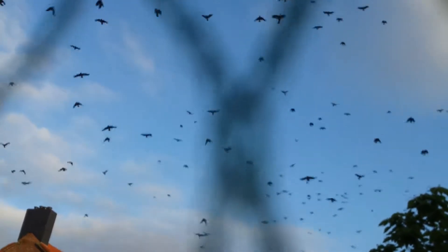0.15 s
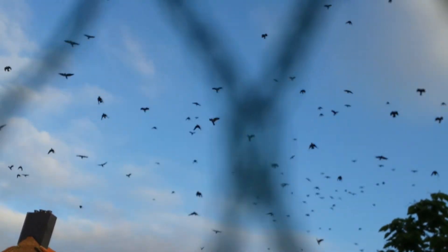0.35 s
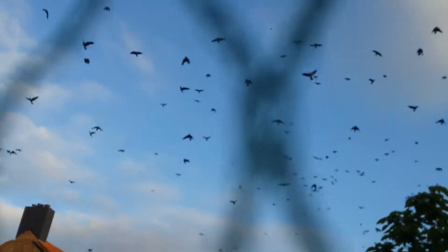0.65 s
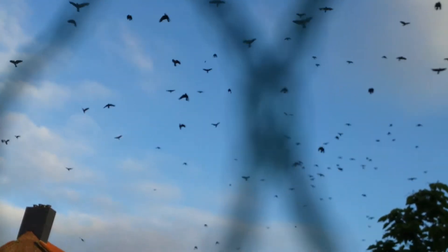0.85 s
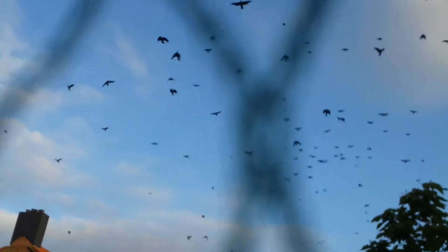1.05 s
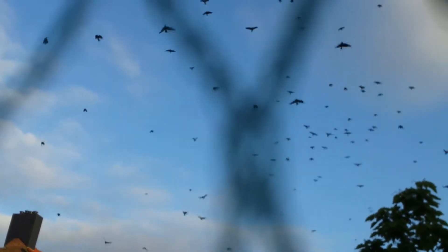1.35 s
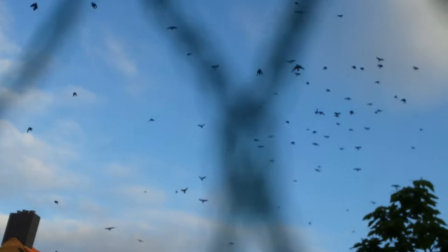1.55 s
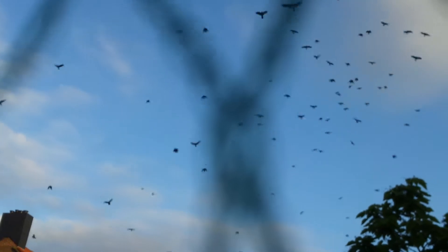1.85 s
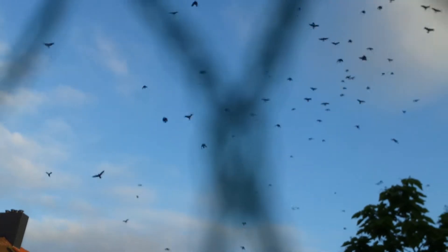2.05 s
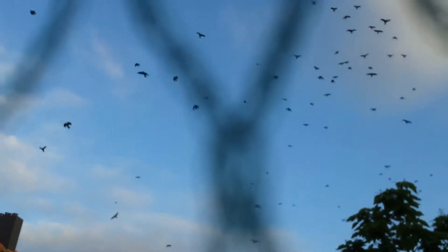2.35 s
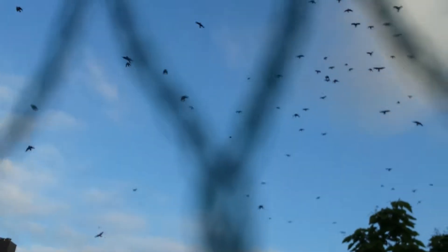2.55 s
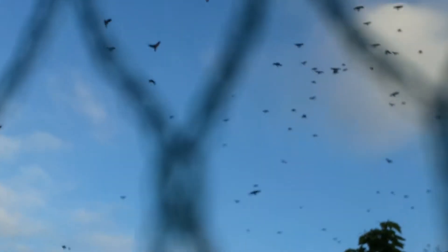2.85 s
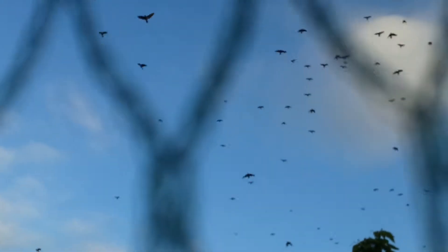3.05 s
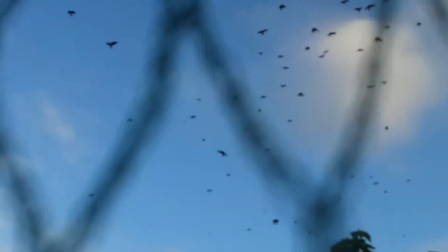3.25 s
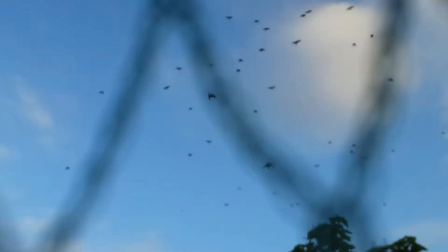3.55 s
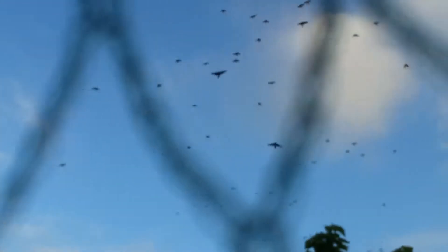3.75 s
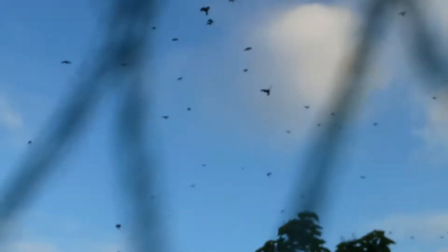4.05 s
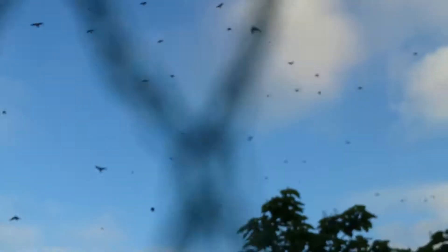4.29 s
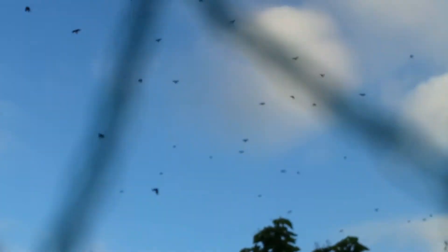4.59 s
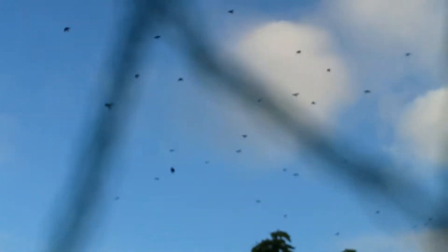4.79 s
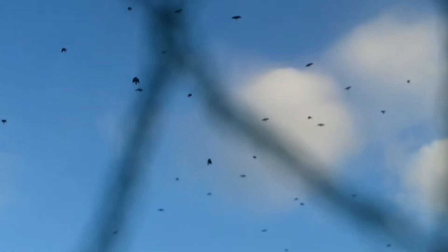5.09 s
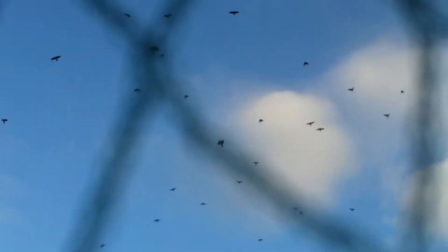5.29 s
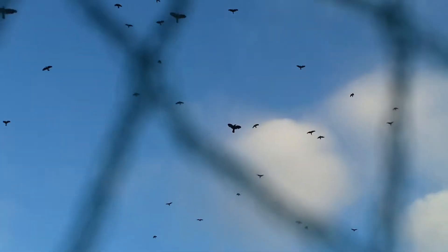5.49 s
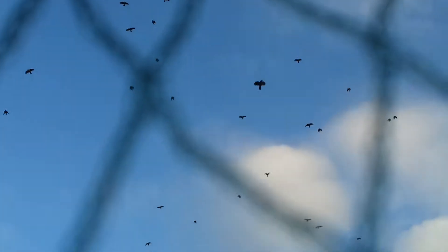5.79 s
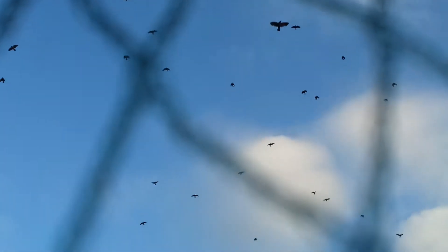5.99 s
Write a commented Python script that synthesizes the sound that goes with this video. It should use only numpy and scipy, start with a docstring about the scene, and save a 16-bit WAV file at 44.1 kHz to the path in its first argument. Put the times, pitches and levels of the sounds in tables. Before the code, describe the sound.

A large flock of jackdaws chatters overhead with short, sharp falling calls, thinning gradually over a faint town hum.

```python
"""A flock of jackdaws wheels over rooftops, heard from the ground by a two-port camera microphone.
From the start the town hums behind a dense chatter, each call a short falling stack of overtones
smeared by house walls. Closer groups flare up and the nearest birds cut through one by one.
After a second or so light wind creeps in and thuds on the ports. The far chatter drifts off,
thinnest near four seconds, then returns a little while the close calls carry on to the end."""
import sys
import numpy as np
from scipy import signal
from scipy.fft import rfft, irfft, next_fast_len
from scipy.io import wavfile
from scipy.ndimage import uniform_filter1d, map_coordinates

SR = 44100
rng = np.random.default_rng(int(sys.argv[2]) if len(sys.argv) > 2 else 0)


def wrap_up_sound(samples):
    """Save the sound to the file named by the first command line argument, as 16-bit audio."""
    columns = np.atleast_2d(samples).T
    # keep every value between -1 and 1, then stretch to whole-number steps
    tamed = np.clip(columns, -1, 1)
    steps = np.round(tamed * 32767).astype(np.int16)
    wavfile.write(sys.argv[1], SR, steps)


N = 270333

# Tone of a call through throat, air and microphone. Each row: frequency in Hz, gain in dB.
CALL_EQ = [(120, -70), (470, -21), (800, -18.5), (955, -19.5), (1170, -12), (1750, -4.5), (2010, -5),
           (2580, -1.5), (3470, -15.5), (4240, -7), (4940, -6.5), (8820, -11), (11000, -20.5), (12800, -32),
           (14000, -55)]
# Hum and wind lean left in the bass. Each row: frequency in Hz, left over right in dB.
RUMBLE_PAN = [(40, 8), (170, 2.5), (500, 0.5), (1500, -1)]


def amp(db):
    """Gain of a level in dB."""
    return 10 ** (np.asarray(db) / 20)


def unit(x):
    """x at rms 1."""
    return x / np.sqrt(np.mean(x ** 2) + 1e-20)


def along(points, hz):
    """Read a curve of (Hz, value) points on a log frequency axis."""
    freqs, values = np.transpose(points)
    return np.interp(np.log(hz + 1), np.log(freqs + 1), values)


def fader(points):
    """A gain for every sample, riding through (seconds, dB) points."""
    times, db = np.transpose(points)
    return amp(np.interp(np.arange(N) / SR, times, db))


def filtered(x, response):
    """Equalise x with a gain given as a function of Hz."""
    size = next_fast_len(N + SR // 2)
    return irfft(rfft(x, size) * response(np.fft.rfftfreq(size, 1 / SR)), size)[..., :N]


def pan(points, hz):
    """Gains of the two ports from (Hz, left over right in dB) points."""
    return amp(np.outer([.5, -.5], along(points, hz)))


def town_hum():
    """Far traffic blurs into a bed of low noise, closest to mono in the upper bass."""
    # Each row: frequency in Hz, relative noise density in dB.
    spectrum = [(60, -79), (100, -36), (135, -17), (206, -8.5), (416, -12.5), (573, -11.5), (652, -16.5),
                (800, -14), (970, -16.5), (1400, -14.5), (1950, -16), (3300, -120)]
    # Each row: time in seconds, level in dB.
    levels = [(0.0, -45.5), (1.96, -47), (2.85, -45), (4.15, -45.5), (6.13, -47.5)]
    # Each row: frequency in Hz, correlation of left and right.
    likeness = [(60, 0.23), (170, 0.82), (350, 0.64), (700, 0.52), (1400, 0.21)]

    def mid_side_eq(hz):
        width = np.arccos(np.clip(along(likeness, hz), -1, 1)) / 2
        return amp(along(spectrum, hz)) * [np.cos(width), np.sin(width)]

    mid, side = filtered(rng.standard_normal((2, N)), mid_side_eq)
    hum = filtered(np.array([mid + side, mid - side]), lambda hz: pan(RUMBLE_PAN, hz))
    return fader(levels) * hum / np.std(hum.mean(0))


def calls(rows, jitter, rasp, beak_width_hz, colour_db, rolloff_db, overtones=10):
    """Jackdaw calls: hoarse, gliding overtone stacks ring through the open beak."""
    # Each row: start and length in seconds, first and last pitch in Hz, source level in dB,
    # beak resonance in Hz, its lift in dB, left over right in dB.
    start, length, hz0, hz1, db, beak_hz, lift_db, pan_db = np.transpose(rows)[:, :, None]
    n = np.arange(int(length.max() * SR) + 1)
    progress = np.clip(n / SR / length, 0, 1)
    noise = rng.standard_normal((2, len(start), len(n)), np.float32)
    pitch_flutter, level_flutter = uniform_filter1d(noise, size=40, axis=2) * np.sqrt(40)
    glide = hz0 + (hz1 - hz0) * progress ** 2 * (3 - 2 * progress)
    pitch = glide * (1 + jitter * pitch_flutter)
    fundamental = np.exp(2j * np.pi * np.cumsum(pitch, 1) / SR).astype(np.complex64)
    colour = amp(colour_db * rng.standard_normal((len(start), overtones))
                 - rolloff_db * np.arange(overtones))
    overtone, voice = np.ones_like(fundamental), 0
    for k in range(1, overtones + 1):
        overtone = overtone * fundamental
        # the beak lifts whichever overtone glides through its resonance
        beak = 1 + (amp(lift_db) - 1) / (1 + ((k * pitch - beak_hz) / beak_width_hz) ** 2)
        voice = voice + colour[:, k - 1:k] * beak * overtone.imag
    envelope = np.clip(n / SR / 0.0085, 0, 1) * (1 - progress ** 4.6)  # sharp attack, fading end
    voice = voice * envelope * amp(db) * (1 + rasp * level_flutter)
    ports = []
    for side in (.5, -.5):
        # a bird to one side is louder and earlier at that port
        at = np.round(start * SR - side * 3 * pan_db).astype(int) + n + SR
        panned = voice * amp(side * pan_db)
        ports.append(np.bincount(at.ravel(), panned.ravel(), N + 2 * SR)[SR:N + SR])
    return np.array(ports)


def wall_echoes(x, hop=4096):
    """Houses scatter the calls; the birds move, so each moment and port gets its own tail."""
    # Each row: frequency in Hz, seconds to die away by 60 dB.
    decay_times = [(800, 0.73), (3000, 0.9), (10000, 0.33)]
    starts = np.arange(0, N, hop)
    padded = np.pad(x, ((0, 0), (hop, 2 * hop)))
    grains = padded[:, starts[:, None] + np.arange(2 * hop)] * np.hanning(2 * hop)
    hz, t, noise = signal.stft(rng.standard_normal((2, len(starts), SR // 3)), SR, nperseg=256)
    decay = amp(-60 * t / along(decay_times, hz)[:, None])
    tails = signal.istft(noise * decay, SR, nperseg=256)[1]
    echoes = signal.fftconvolve(grains, tails / np.linalg.norm(tails[0, 0]), axes=2)
    at = starts[:, None] + np.arange(echoes.shape[2]) + 300  # 7 ms pre-delay: the nearest wall
    return np.array([np.bincount(at.ravel(), port.ravel())[hop:N + hop] for port in echoes])


def chatter_swells():
    """Body and treble gains: closer groups flare over the far birds, losing less treble to the air."""
    # The far birds, drifting off. Each row: time in seconds, level in dB.
    far_levels = [(0, -29.5), (1.2, -29), (2.2, -33), (2.8, -34.5), (4.15, -40.5), (5.2, -36), (6.13, -34)]
    # Each row: start, swell and hold in seconds, body level in dB, treble over body in dB.
    outbursts = [(-.05, 0.037, 0.1, -26, -1), (.16, 0.04, 0.039, -22.5, -6),
                 (.32, 0.088, 0.038, -23.5, 0.5), (.5, 0.023, 0.038, -25.5, -0.5),
                 (.61, 0.045, 0.045, -26, -2), (.84, 0.03, 0.14, -25.5, 1),
                 (1.19, 0.066, 0.092, -31.5, 3.5), (1.4, 0.022, 0.052, -28, -3),
                 (1.575, 0.029, 0.037, -27, -3.5), (1.72, 0.096, 0.13, -29.5, 1.5),
                 (1.98, 0.062, 0.032, -26, -2), (2.19, 0.086, 0.22, -27.5, -3),
                 (2.53, 0.043, 0.024, -31.5, 1.5), (2.8, 0.097, 0.066, -32.5, 1.5),
                 (2.95, 0.077, 0.11, -30.5, -11), (3.07, 0.038, 0.13, -31.5, -3.5),
                 (3.25, 0.07, 0.094, -29, -3), (3.52, 0.022, 0.11, -30.5, -3),
                 (3.715, 0.015, 0.16, -29, -1), (3.85, 0.087, 0.14, -30.5, -2.5),
                 (4.175, 0.025, 0.11, -29, -3.5), (4.39, 0.024, 0.3, -30, -3.5),
                 (4.61, 0.067, 0.14, -32, 0), (4.95, 0.058, 0.096, -34, -1.5),
                 (5.18, 0.025, 0.041, -35.5, 2.5), (5.35, 0.023, 0.33, -35.5, 2.5),
                 (5.75, 0.063, 0.077, -30.5, -0.5), (6.02, 0.069, 0.046, -29, -8)]
    release_db_per_s, treble_fade_db_per_s, far_treble_db = 108, 32.5, -6
    steps = np.arange(0, N, 64)
    start, swell, hold, db, treble_db = np.transpose(outbursts)[:, :, None]
    age = steps / SR - start
    released = np.maximum(age - swell - hold, 0)
    body = np.clip(age / swell, 0, 1) * amp(db - release_db_per_s * released)
    treble = body * amp(treble_db - treble_fade_db_per_s * np.maximum(age - swell, 0))
    far = fader(far_levels)[steps]
    body_power = far ** 2 + (body ** 2).sum(0)
    treble_power = (far * amp(far_treble_db)) ** 2 + (treble ** 2).sum(0)
    return [np.interp(np.arange(N), steps, np.sqrt(power)) for power in (body_power, treble_power)]


def flock(count=1000, crossover_hz=3400):
    """Hundreds of calls at chance moments, pitches and distances merge into a surging chatter."""
    # Each row: frequency in Hz, left over right in dB.
    flock_pan = [(1000, -0.5), (2500, 3.5), (5000, 2), (10000, -0.5)]
    timing, duration, sag, beak = rng.random((count, 4)).T
    pitch, level, lift, side = rng.standard_normal((count, 4)).T
    start = (np.arange(count) + 8 * timing) / count * (N / SR + .1) - .12  # never a pause
    hz0 = 1300 * np.exp(.21 * pitch)
    hz1 = hz0 * (1 - .11 - .14 * sag ** 2)  # a fall of 11 to 25 %, mostly small
    rows = np.transpose([start, .028 + .03 * duration, hz0, hz1, 1.38 * level,
                         1800 + 4500 * beak, 4.7 + 1.4 * lift, 2.5 * side])
    raw = calls(rows, jitter=0.014, rasp=0.6, beak_width_hz=450., colour_db=3.0, rolloff_db=0.37)
    voiced = filtered(raw, lambda hz: amp(along(CALL_EQ, hz)) * pan(flock_pan, hz))
    body_gain, treble_gain = chatter_swells()
    body = filtered(voiced, lambda hz: 1 / (1 + (hz / crossover_hz) ** 8))
    direct = body_gain * unit(body) + treble_gain * unit(voiced - body)
    return unit(direct + amp(-3) * wall_echoes(direct)) * np.std(direct)  # wetter, no louder


def near_birds():
    """Foreground calls a listener can point at: close, so the houses add less echo."""
    # Each row: start and length in seconds, first and last pitch in Hz, source level in dB,
    # beak resonance in multiples of the mean pitch, left over right in dB.
    cues = [(0.049, 0.068, 1300, 1053, -29.5, 5, 1), (0.061, 0.032, 903, 767, -41, 1, 2.5),
            (0.345, 0.034, 1616, 1534, -27, 2, -5), (0.397, 0.028, 912, 830, -34, 2, 2.5),
            (0.403, 0.029, 1424, 1336, -30, 2, 3.5), (0.43, .03, 1278, 1223, -30, 4, 4),
            (0.519, 0.03, 1200, 1135, -33, 4, 12), (.525, 0.051, 1255, 1164, -37.5, 2, 2),
            (0.628, 0.032, 1350, 1256, -35, 2, 4.5), (0.672, .035, 1410, 1300, -35.5, 2, 5),
            (0.605, 0.033, 1500, 1350, -33, 4, 5.5), (0.822, 0.035, 1400, 1320, -34.5, 3, 7.5),
            (0.868, 0.072, 1100, 782, -33, 2, 2.5), (0.868, 0.032, 1329, 1253, -36, 2, 11.5),
            (0.926, 0.027, 1400, 1287, -34.5, 2, 4.5), (0.963, 0.039, 1346, 1235, -39, 2, 5),
            (1.02, 0.039, 1438, 1370, -34.5, 2, 4.5), (1.047, 0.036, 1517, 1331, -29.5, 3, 9.5),
            (1.061, 0.054, 1360, 1235, -33.5, 3, 6.5), (1.094, 0.061, 877, 606, -43.5, 2, 7.5),
            (1.284, 0.041, 1359, 1260, -37.5, 2, 9.5), (1.443, 0.065, 833, 660, -47, 2, -7.5),
            (1.48, 0.031, 1316, 1250, -34.5, 3, 7), (1.578, 0.089, 1455, 850, -35.5, 1.75, 12),
            (1.638, 0.037, 957, 893, -38, 4, 12), (1.786, 0.047, 1342, 1054, -35.5, 2, 5),
            (1.82, 0.03, 1822, 1570, -29.5, 2, 3.5), (2.01, 0.034, 1570, 1504, -34.5, 2, 4),
            (2.05, 0.039, 1470, 1092, -37, 2, -0.5), (2.192, 0.067, 1333, 1260, -36, 3, 4),
            (2.194, 0.063, 1312, 990, -44, 1, 0), (2.395, 0.04, 907, 790, -56, 1, 1),
            (2.542, 0.079, 1240, 1059, -34, 2, 3), (2.564, 0.038, 1458, 1054, -38, 1, 0),
            (2.58, 0.018, 1192, 1210, -31.5, 4, 6.5), (2.595, 0.032, 1610, 1765, -34, 1, 5.5),
            (2.817, 0.025, 1440, 1410, -37, 3, 5.5), (2.856, 0.1, 1276, 1163, -40, 4, 5.5),
            (2.839, 0.059, 1329, 1040, -39.5, 2, 5), (2.961, 0.064, 1566, 1434, -44, 2, -0.5),
            (3.085, 0.066, 1350, 1425, -38.5, 3, 4), (3.105, 0.028, 1450, 1148, -35.5, 2, 0.5),
            (3.265, 0.046, 1490, 1153, -37, 2, 2.5), (3.3, 0.029, 1425, 1190, -47, 2, 1),
            (3.322, .1, 984, 819, -43.5, 2, 5), (3.723, 0.0396, 1277, 1219, -26.5, 4, 6.5),
            (3.724, 0.0374, 1285, 1242, -36, 2, 6.5), (3.751, 0.051, 974, 775, -38, 2, -3.5),
            (3.777, 0.027, 1070, 1040, -41, 2, 6), (4.189, 0.056, 1500, 1135, -37, 2, 1),
            (4.208, 0.046, 1480, 1424, -39, 4, 11), (4.419, 0.038, 1264, 970, -40, 2, -1.5),
            (4.456, 0.057, 920, 658, -41.5, 2, 1.5), (4.541, 0.032, 1327, 1280, -43, 3, 2),
            (4.621, 0.039, 1448, 1295, -42, 2, 2.5), (4.622, 0.03, 1480, 1332, -39, 4, 2),
            (4.669, 0.051, 1394, 1280, -34, 4, 2), (4.677, 0.033, 1375, 1300, -51, 2, 2.5),
            (4.685, 0.037, 1210, 1163, -39, 4, 2.5), (4.699, 0.03, 1068, 970, -38, 2, 2),
            (4.715, 0.037, 1165, 1220, -43, 2, -2), (4.73, 0.055, 1256, 1210, -44, 4, 2.5),
            (4.74, 0.031, 1237, 1190, -39, 2, 4), (4.764, .025, 1130, 1020, -37, 2, 1),
            (4.786, 0.015, 1295, 1260, -48, 2, 1), (4.981, 0.046, 1378, 960, -41.5, 1, 7),
            (5.088, 0.045, 1330, 1036, -43, 2, 0), (5.175, 0.099, 1292, 1200, -46, 4, 10),
            (5.19, 0.05, 1294, 1246, -40.5, 1, 1.5), (5.229, 0.095, 997, 735, -43, 2, 1),
            (5.35, 0.027, 1413, 1355, -43, 4, -5), (5.369, 0.021, 1490, 1550, -39, 4, 2),
            (5.372, 0.03, 842, 565, -40.5, 2, 1), (5.404, 0.027, 1050, 897, -41, 2, 3.5),
            (5.409, 0.027, 953, 813, -34, 5, 6), (5.552, 0.038, 1390, 1250, -36.5, 3, 8),
            (5.642, 0.035, 1389, 1048, -36, 2, 7), (5.762, 0.028, 1086, 940, -40.5, 2, 7.5),
            (5.772, 0.031, 1412, 1263, -41, 2, 4.5), (5.816, 0.04, 944, 876, -41, 2, 1.5),
            (5.82, 0.054, 1403, 1256, -42, 2, 4.5), (5.77, 0.041, 1343, 1222, -34.5, 4, 8),
            (5.786, 0.05, 1430, 1267, -40.5, 2, 11), (5.841, 0.031, 1292, 1192, -32, 3, 4.5),
            (5.9, 0.028, 1250, 1210, -50, 2, 5.5)]
    start, length, hz0, hz1, db, overtone, pan_db = np.transpose(cues)
    beak_hz = overtone * (hz0 + hz1) / 2
    lift_db = 17 - .9 * overtone  # a higher overtone is lifted less
    rows = np.transpose([start, length, hz0, hz1, db, beak_hz, lift_db, pan_db])
    direct = calls(rows, jitter=.012, rasp=.6, beak_width_hz=600., colour_db=1.5, rolloff_db=1.3)
    with_echoes = direct + amp(-5.5) * wall_echoes(direct)
    return filtered(with_echoes, lambda hz: amp(along(CALL_EQ, hz)))


def wind(thud_half_width_s=0.052, lumps_per_s=9):
    """A light breeze buffets the ports and gusts land as soft thuds, more on the left."""
    # Each row: frequency in Hz, relative noise density in dB.
    spectrum = [(20, -20), (45, -24), (100, -4), (140, 2), (300, -90)]
    # Each row: time in seconds, level in dB.
    breeze = [(0, -95), (0.7, -75), (2.9, -63.5), (6.13, -64)]
    # Each row: time of the crest in seconds, its level in dB.
    thuds = [(1.16, -77), (2.45, -65), (2.95, -77), (3.52, -66), (4.17, -75), (4.57, -84), (4.97, -70),
             (5.6, -67)]
    shared, *per_port = rng.standard_normal((3, N))
    noise = shared + 0.78 * np.array(per_port)
    rumble = filtered(noise, lambda hz: amp(along(spectrum, hz)) * pan(RUMBLE_PAN, hz))
    lumps = amp(3.1 * map_coordinates(rng.standard_normal(60), [np.arange(N) * lumps_per_s / SR]))
    crest, db = np.transpose(thuds)[:, :, None]
    gusts = (amp(db) * np.exp(-((np.arange(N) / SR - crest) / thud_half_width_s) ** 2)).sum(0)
    return (fader(breeze) + gusts) * unit(lumps * rumble)


def scene():
    """Near birds in front, the flock behind, town and wind underneath."""
    return near_birds() + flock() + town_hum() + wind()


def record(dry, top_hz=14400):
    """The camera keeps nothing above its band limit."""
    return filtered(dry, lambda hz: hz < top_hz)


dry = scene()
out = record(dry)
wrap_up_sound(out)
```